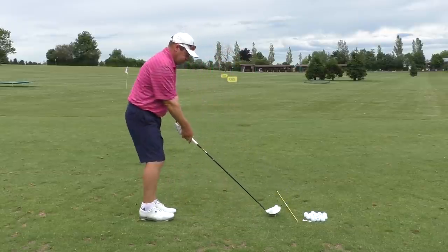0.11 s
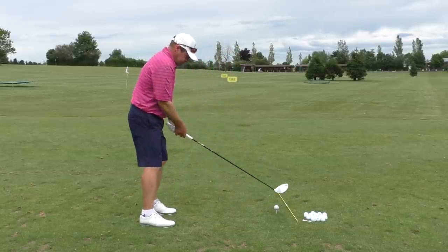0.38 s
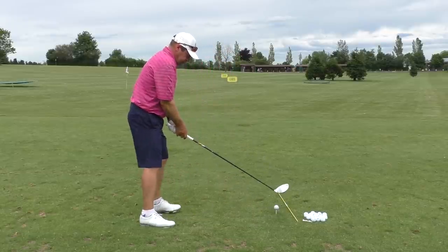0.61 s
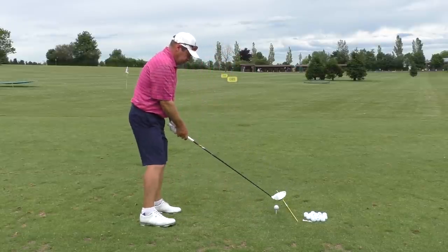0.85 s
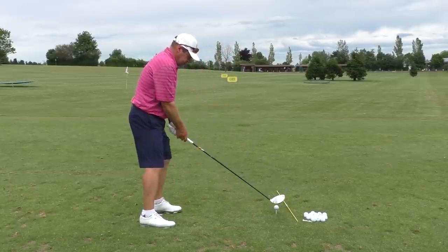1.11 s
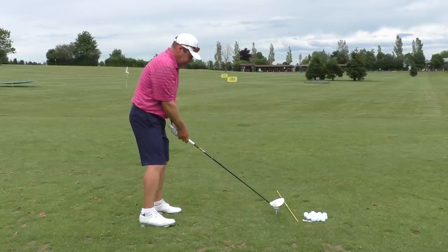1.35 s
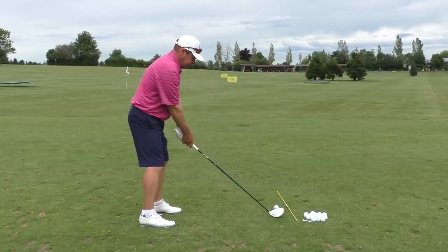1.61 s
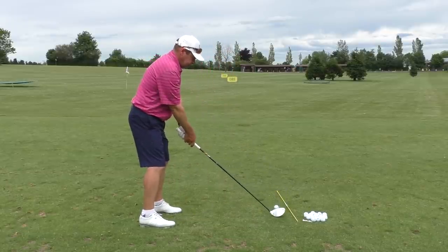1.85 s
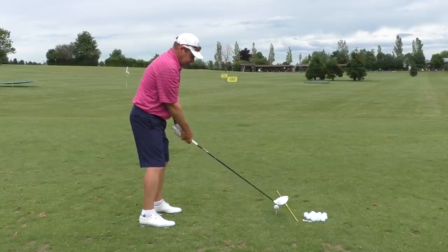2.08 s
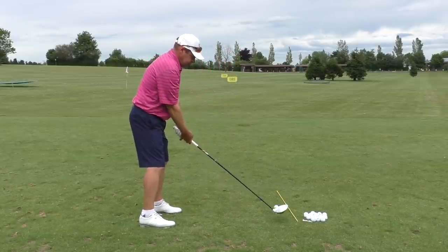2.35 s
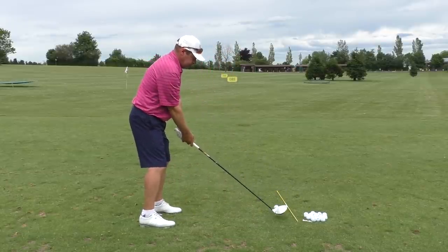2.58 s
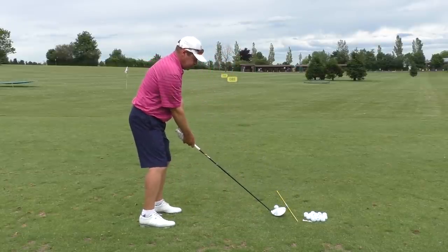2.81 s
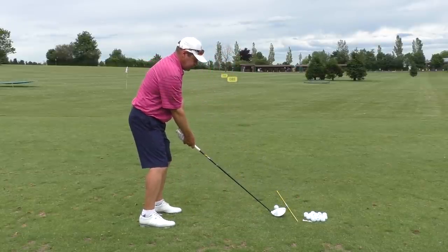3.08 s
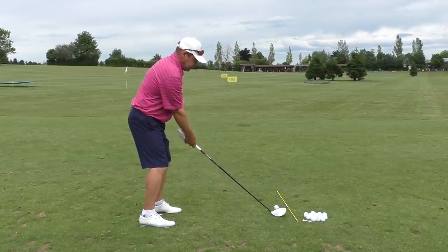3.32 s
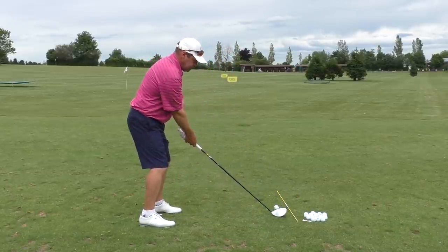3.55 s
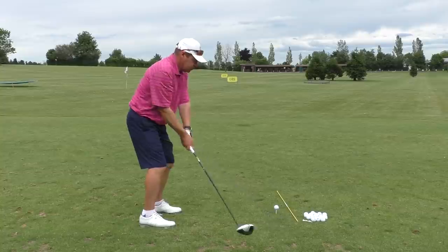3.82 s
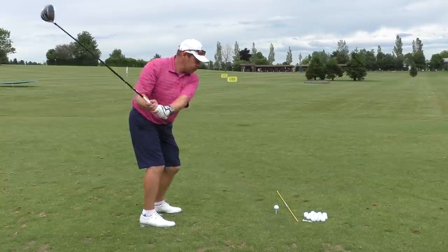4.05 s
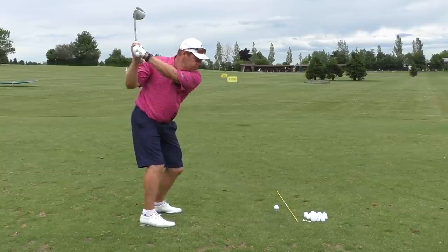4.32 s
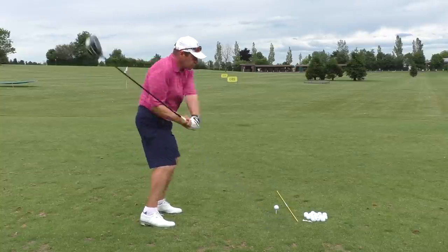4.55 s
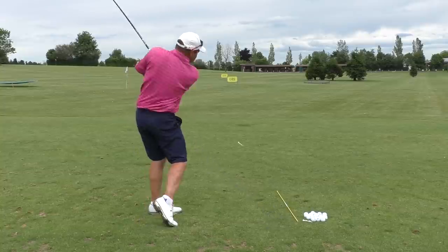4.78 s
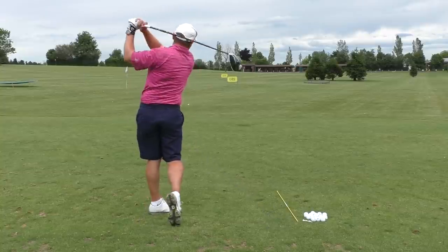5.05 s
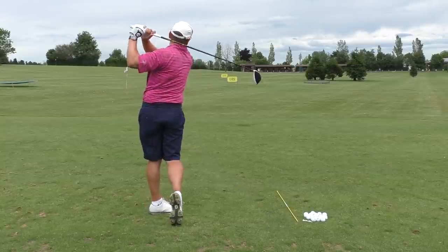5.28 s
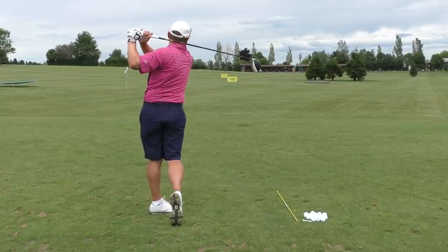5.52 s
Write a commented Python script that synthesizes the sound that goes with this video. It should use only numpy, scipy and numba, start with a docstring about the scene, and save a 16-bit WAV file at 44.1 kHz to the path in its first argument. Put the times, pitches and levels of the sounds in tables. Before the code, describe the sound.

A quiet open driving range, heard in mono by one microphone near the golfer. A soft murmur of air and distant traffic, a faint low engine hum and gusting wind rumble, strongest around 2.5 and 3.1 s, run throughout. Sparrows give brief warbled chirps at about 0.45, 1.0, 2.1, 2.8, 3.7, 4.3 and 5.2 s, among fainter gliding notes, trills and far twitter. Small ticks fall at 0.2 and 1.8 s; the club head brushes grass with a faint grainy hiss at 1.7 and 3.7 s. At 4.65 s a very short rising whoosh leads to the strike at 4.73 s: an extremely loud, sharp, slightly distorted metallic crack with a thud and bright hollow ring, mostly gone within a tenth of a second. The background dips briefly. Thin hiss, faint singing metal and a wavering high whistle fade by 5.27 s, with a small tick near 5.2 s; birds and murmur continue to the end at about 5.6 s.

```python
"""Golf drive on an open range. From the start: sparrow chirps (warbled sines) and further birds (gliding notes),
over engine orders, murmur in noise bands and wind rumble. Ticks fall here and there; at 1.7 and 3.7 s the club
head brushes the grass (grainy hiss). At 4.65 s the shaft whooshes (noise bands that rise), at 4.73 s the ball
cracks off the face and the hollow head rings (decaying modes, noise bursts); the input clips and the gain ducks.
Then a thin hiss, a singing head and a faint whistle up to 5.27 s, while birds and background go on."""
import sys
import numpy as np
from scipy import signal
from scipy.fft import rfft, irfft
from scipy.io import wavfile
from scipy.ndimage import uniform_filter1d, minimum_filter1d
from numba import njit

SR = 44100
rng = np.random.default_rng(int(sys.argv[2]) if len(sys.argv) > 2 else 0)


def transcribe(u):
    """Save the signal u as a 16-bit wav file named by the first command-line argument.

    u: samples, shape (n,) or (channels, n), limited to [-1, 1]; the rate is SR.
    q: integer samples, one column per channel.
    """
    v = np.clip(np.atleast_2d(u).T, -1, 1)
    q = np.round(v * 32767).astype(np.int16)
    wavfile.write(sys.argv[1], SR, q)


def volts_from_decibels(level):
    """Turn decibel levels (scalar or array-like) into linear amplitude factors."""
    exponent = np.asarray(level, float) / 20
    return 10 ** exponent


N = 249253
T = np.arange(N) / SR  # time [s]

STRIKE_S, FULL_SPEED_S = 4.7314, 4.711
# modes of the hollow head: (frequency [Hz], level [dB], t60 [s])
HEAD_MODES = [(3117, -22, .08), (3222, -22, .07), (3325, -26, .14), (3670, -11, .045), (3898, 0, .08),
              (4091, -11, .055), (4226, -24, .085), (4810, -22, .05), (5120, -24, .085), (5416, -13, .09),
              (5770, -17, .08), (5895, -14, .09), (6130, -19, .08), (6363, -28, .066), (6804, -24, .056),
              (7526, -18, .04), (7660, -32, .084), (8899, -32, .06), (9975, -29, .055), (10980, -30, .05),
              (11500, -26, .03)]
# thud of the squashed ball and face: (frequency [Hz], level [dB], t60 [s])
BALL_MODES = [(720, 12, .0048), (340, -3, .007), (130, -15, .02), (1650, -3, .011), (2200, -8, .01),
              (2700, -6, .012)]
# slowest modes, raised a little by the head's motion: (frequency [Hz], level [dB])
SLOWEST_MODES = [(3945, 0), (3330, -5), (5835, -7), (5420, -12), (4230, -11)]
# the head sings on as it turns, sags slowly, then turns away
SING_FROM_S, SING_DB, SING_SAG_DB_S, SING_AWAY_S, SING_AWAY_DB_S = 4.802, -46, 46.5, 4.92, 231.5

# downswing: onset slope, then gain and shedding pitch at full speed with the climb towards each
RUSH_FROM_S, RUSH_ONSET_DB_S = 4.65, 650
RUSH_DB, RUSH_DB_S, SHED_HZ, SHED_HZ_S = -30.5, 110, 711, 1750
MID_DB, MID_DB_S, TOP_DB, TOP_DB_S = -45.5, 260, -56.5, 250  # two hisses likewise
# follow-through, air and grass blades: (peak time [s], gain [dB], rise [dB/s], fall [dB/s])
FOLLOW_SWELLS = [(4.815, -69, 300, 80), (4.876, -64.5, 120, 180), (4.96, -78, 60, 27)]

# pitch of the thin whistle after the blow: (time [s], frequency [Hz])
WHISTLE_PITCH = [(4.75, 2021), (4.88, 2135), (5.1, 2190), (5.165, 2242), (5.27, 2250)]
# its flares: (peak time [s], level of partial 1 [dB], of partial 2 [dB], of partial 3 [dB])
WHISTLE_FLARES = [(4.888, -50.5, -54, -56), (5.02, -75, -61.5, -72.5), (5.168, -80, -56.5, -61)]
# slopes of its flares, one row a partial: (rise [dB/s], fall [dB/s])
FLARE_SLOPES = [(55, 390), (300, 277), (380, 214)]

# the sole sweeps the grass: (peak time [s], gain [dB], rise [dB/s], fall [dB/s])
BRUSH_SWELLS = [(1.72, -76, 400, 119.5), (3.68, -73, 450, 60), (3.765, -68, 110, 150)]
# small ticks: (time [s], gain [dB], frequency [Hz], t60 of the noise part [s])
TICKS = [(.1755, -44, 2500, .012), (.1755, -46, 1300, .012), (.1755, -44, 650, .015),
         (1.769, -42, 1420, .016), (1.769, -49, 2800, .01), (5.234, -48, 800, .015),
         (1.435, -60, 11000, .008), (5.0, -58, 13000, .008), (5.425, -55, 9000, .008),
         (1.52, -54, 3500, .01), (3.58, -54, 4000, .008), (.11, -56, 3600, .008)]

# sparrow chirps: (time of the arch top [s], gain [dB], length after it [s])
CHIRPS = [(.451, -51, 0.0206), (1.037, -47, 0.086), (2.112, -52, 0.0208), (2.83, -48.5, 0.075),
          (3.699, -49.5, 0.024), (4.323, -49, 0.108), (5.171, -56.5, 0.073)]
# second voice in a long chirp: (time from the arch top [s], length [s], start [Hz], end [Hz], relative gain [dB])
STROKES = [(-.031, 0.0096, 5580, 6520, -22.5), (-.021, .0055, 6510, 4416, -16),
           (-.014, .0068, 3553, 5510, -7), (.0, .0061, 4704, 5520, -14.5)]
# low stroke, thrice at the end of a long chirp: (length [s], start [Hz], end [Hz], relative gain [dB])
CLOSING_STROKE = (0.003, 2621.5, 1900.5, -11)
CLOSING_S, CLOSING_GAP_S = .088, 0.0094
# a high arch, then a warble on a sinking pitch that fades and breaks once
ARCH_HZ, ARCH_S, ARCH_DB, SINK_HZ, SINK_S, REST_HZ = 879.8, .007, -5, 613, 0.037, 3132.5
WARBLE_HZ, WARBLE_S, WARBLE_TOP_S = 230, .0132, .028  # depth, period, one crest
FADE_DB_S, BREAK_S, BREAK_WIDE_S, BREAK_DB = 150.5, .037, 0.0052, -16
# a short chirp is said again, its arch swallowed
REPEAT_S, REPEAT_DB, REPEAT_ARCH_DB, REPEAT_LONG_S = .021, 2, -16, .014

# repeats of one falling stroke: (time [s], gain [dB])
FALLS = [(.314, -60), (.392, -60.5), (.478, -59.5), (.552, -62), (.632, -63)]
# that stroke: (length [s], start [Hz], end [Hz])
FALL_STROKE = (.036, 3380, 2270)
FALL_ECHO_S, FALL_ECHO_DB = .012, -7  # off the trees
# forked calls: (time [s], gain of the rising voice [dB], of the falling voice [dB])
FORKS = [(.058, -66, -63), (.13, -69, -76.5), (.206, -70.5, -60.5)]
# rising voice: (length [s], start [Hz], end [Hz])
FORK_UP = (.016, 4830, 5800)
# falling voice: (length [s], start [Hz], end [Hz])
FORK_DOWN = (0.03, 4800, 3120)
# single notes of further birds: (time [s], length [s], start [Hz], end [Hz], gain [dB])
NOTES = [(.139, .06, 4500, 4700, -70), (.362, .03, 4060, 3450, -66.5), (.724, .006, 4440, 2890, -59),
         (.745, .008, 3504, 4600, -62), (.857, 0.0616, 4450, 4350, -65), (1.674, 0.0925, 2450, 2260, -66.5),
         (1.683, 0.0225, 3686, 3400, -63), (1.79, 0.042, 2043, 2060, -63.5),
         (1.802, 0.0465, 4000, 3200, -62.5), (2.037, 0.0075, 4280, 2800, -55.5),
         (2.332, 0.0081, 2770, 2300, -64), (2.469, 0.0117, 2886, 2300, -64),
         (2.719, 0.0486, 3250, 3540, -67.5), (2.785, 0.0105, 3420, 2800, -60.5),
         (3.062, 0.068, 5396, 4300, -74.5), (3.2, 0.112, 3700, 2700, -66),
         (3.343, 0.243, 3299, 3460, -69.5), (3.6, .076, 3934, 3500, -68), (3.862, 0.1035, 2940, 3165, -64),
         (4.02, 0.037, 3350, 3050, -61.5), (4.075, 0.0234, 3320, 2970, -65),
         (4.118, .03, 3910, 3400, -66.5), (4.148, .035, 3360, 3340, -61.5), (4.24, 0.0384, 3000, 3050, -66),
         (4.283, 0.06, 3250, 3470, -66)]
# high trills: (time [s], length [s], start [Hz], end [Hz], gain [dB])
TRILLS = [(1.874, 0.098, 4460, 4190, -62), (2.0, 0.112, 4445, 4605, -65.5),
          (2.18, 0.062, 4640, 5090, -68.5)]
TRILL_PER_S = 62.7

# spectrum of the open-air murmur: (frequency [Hz], relative density [dB per Hz])
AIR_SPECTRUM = [(12, -39.5), (20, -13), (120, 2), (168, -4.5), (255, -11), (319, -12.5), (347, -16.5),
                (388, -14), (446, -17), (1190, -17), (1760, -22.5), (2500, -26.5), (3740, -26.5),
                (5230, -38), (14300, -41.5), (16000, -44.5)]
AIR_DB = -51
# distant engine: (time [s], level of order 1 [dB], of order 2 [dB], of order 3 [dB])
ENGINE_ORDERS = [(0, -75, -75, -74.5), (.66, -58.5, -70, -72.5), (1.3, -67, -71, -72),
                 (2.2, -62, -69.5, -74), (2.7, -57, -77, -68.5), (3.3, -59, -71.5, -61.5),
                 (3.9, -61, -60, -66), (4.3, -62, -70.5, -70.5), (5.1, -69.5, -68, -78),
                 (5.65, -68, -62, -71.5)]
ENGINE_HZ = 127.58
# wind on the microphone: (time [s], level [dB])
WIND_LEVEL = [(0, -74.5), (.9, -63.5), (2.3, -62.5), (2.55, -55.5), (2.8, -62), (3.1, -52), (3.4, -61.5),
              (4.5, -61), (5.2, -70.5), (5.65, -63)]


def curve(rows):
    """Soft gate open between a table's ends, then its columns at every sample."""
    s, *columns = np.transpose(rows)
    gate = np.clip(np.minimum(T - s[0], s[-1] - T) / .006, 0, 1)
    return [gate] + [np.interp(T, s, c) for c in columns]


def swell(peak_s, db, rise_db_s, fall_db_s):
    """Gain that climbs to db at peak_s and falls away, both straight in dB."""
    return volts_from_decibels(db - np.maximum(rise_db_s * (peak_s - T), fall_db_s * (T - peak_s)))


def unit(x):
    """Scale to rms 1."""
    return x / np.sqrt(np.mean(x ** 2))


@njit
def svf(x, hz, width):
    """State-variable band-pass with a moving centre, gain 1 there; width in Hz."""
    y, band, low = np.empty(len(x)), 0., 0.
    for i in range(len(x)):
        g, k = np.tan(np.pi * hz[i] / SR), width / hz[i]
        v = (band + g * (x[i] - low)) / (1 + g * (g + k))
        band, low, y[i] = 2 * v - band, low + 2 * g * v, k * v
    return y


def hiss(hz, width, count=N):
    """White noise through two equal band-passes, rms 1."""
    hz = hz + np.zeros(count)
    once = svf(rng.standard_normal(count), hz, width)
    return unit(svf(once, hz, width))


def walk(rate):
    """Random levels held 1 / rate s and slewed twice; spread near 1."""
    k = int(SR / rate)
    steps = np.repeat(rng.standard_normal(N // k + 1), k)
    return 1.3 * uniform_filter1d(uniform_filter1d(steps, k), k)[:N]


def tone(hz):
    """Sine of rms 1 on a moving pitch."""
    return np.sqrt(2) * np.sin(2 * np.pi * np.cumsum(hz) / SR)


def ring(modes, rise_s, phase=0):
    """Half a second of exponentially decaying modes that build up over rise_s."""
    t = T[:SR // 2]
    waves = sum(volts_from_decibels(db) * np.sin(2 * np.pi * hz * t + phase) * 1000 ** (-t / t60_s) for hz, db, t60_s in modes)
    return waves * (1 - np.exp(-(t / rise_s) ** 2))


def add(out, s, x):
    """Mix x in from time s."""
    i = int(s * SR)
    out[i:i + len(x)] += x[:N - i]


def strike():
    """The ball thuds at once, the shell takes a moment to ring up, a bright crack dies in milliseconds."""
    out, t = np.zeros(N), T[:SR // 2]
    crack = volts_from_decibels(-5.5) * hiss(6000., 8700., count=len(t)) * 1000 ** (-t / .0148)
    crack = crack + volts_from_decibels(-5) * hiss(13200., 6200., count=len(t)) * 1000 ** (-t / .008)
    # many dense upper modes blur into a metallic rattle
    rattle = volts_from_decibels(-22) * hiss(4400., 5000., count=len(t)) * 1000 ** (-t / .1)
    # the face swings out of line within a few hundredths of a second, unevenly
    turn_db = -9 * (1 - np.exp(-(t / .02) ** 3))
    uneven_db = 2.5 * walk(200)[:len(t)] * np.clip(t / .02, 0, 1)
    shell = ring(HEAD_MODES, .0014) * volts_from_decibels(turn_db + uneven_db)
    thud = ring(BALL_MODES, .00005, phase=1.15)
    add(out, STRIKE_S, volts_from_decibels(1.4) * thud + volts_from_decibels(-.5) * shell + crack + rattle)
    return out


def singing_head():
    """The slowest modes, as narrow noise bands, waver as the head turns its face away and back."""
    sing = swell(SING_FROM_S, SING_DB, 600, SING_SAG_DB_S) * swell(SING_AWAY_S, 0, 0, SING_AWAY_DB_S)
    return sing * sum(volts_from_decibels(mode_db + 3 * walk(35)) * hiss(hz, 190.) for hz, mode_db in SLOWEST_MODES)


def swing():
    """Vortices shed by the shaft hum unevenly over a broad rush; afterwards only a thin hiss."""
    lead_s = np.clip(FULL_SPEED_S - T, 0, .2)
    gate = volts_from_decibels(-RUSH_ONSET_DB_S * np.maximum(RUSH_FROM_S - T, 0)) * (T < STRIKE_S)
    rush = volts_from_decibels(1.5) * hiss(SHED_HZ - SHED_HZ_S * lead_s, 400.)
    rush = rush + volts_from_decibels(-1.5) * hiss(300., 380.) + volts_from_decibels(-9) * hiss(1300., 1500.)
    grainy_db = 2.5 * walk(120)
    down = gate * volts_from_decibels(RUSH_DB - RUSH_DB_S * lead_s + grainy_db) * rush
    air = volts_from_decibels(MID_DB - MID_DB_S * lead_s) * hiss(3600., 3000.)
    air = air + volts_from_decibels(TOP_DB - TOP_DB_S * lead_s) * hiss(8000., 12000.)
    after = hiss(10000., 10000.) + volts_from_decibels(11) * hiss(5000., 4270.) + volts_from_decibels(13.5) * hiss(1010., 2300.)
    follow = sum(swell(*row) for row in FOLLOW_SWELLS) * (T > STRIKE_S)
    return down + gate ** .3 * air + follow * volts_from_decibels(2 * walk(80)) * after


def whistle():
    """A wavering sine fundamental under two breathy partials of narrow noise."""
    gate, hz = curve(WHISTLE_PITCH)
    gains = [sum(swell(s, dbs[k], *FLARE_SLOPES[k]) for s, *dbs in WHISTLE_FLARES) for k in range(3)]
    breathy = sum(gains[k] * hiss(hz * (k + 1), 90. * (k + 1)) for k in range(1, 3))
    return gate * (gains[0] * volts_from_decibels(2.5 * walk(40)) * tone(hz) + breathy)


def grass():
    """Blades scratch the sole: grainy hiss that faintly excites the head's modes."""
    level = sum(swell(*row) for row in BRUSH_SWELLS)
    grain = rng.standard_normal(N) * volts_from_decibels(2.46 * rng.exponential(size=N))
    scratch = unit(svf(grain, np.full(N, 8500.), 11000.))
    bands = volts_from_decibels(-1.5) * hiss(5840., 120.) + volts_from_decibels(-3) * hiss(6240., 3000.)
    excited = unit(signal.oaconvolve(grain, ring(HEAD_MODES, .001))[:N])
    return level * (scratch + bands + volts_from_decibels(-12.5) * excited)


def ticks():
    """Each tick is one damped mode plus a decaying noise band around it."""
    out = np.zeros(N)
    for s, db, hz, t60_s in TICKS:
        rattle = hiss(hz, .73 * hz, count=SR // 2) * 1000 ** (-T[:SR // 2] / t60_s)
        add(out, s, volts_from_decibels(db) * (ring([(hz, 3, t60_s / 2)], .0001) + rattle))
    return out


def chirp(length_s, arch_db):
    """One sparrow phrase, a sine on a warbling pitch, starting 10 ms before the top of its arch."""
    t = T[:int((length_s + .03) * SR)] - .01
    after_s = np.maximum(t, 0)
    warble_hz = WARBLE_HZ * np.cos(2 * np.pi * (t - WARBLE_TOP_S) / WARBLE_S) * np.clip(t / .014, 0, 1)
    arch = np.exp(-np.abs(t / ARCH_S) ** 2.8)
    hz = REST_HZ + SINK_HZ * np.exp(-after_s / SINK_S) + ARCH_HZ * arch + warble_hz
    break_db = BREAK_DB * np.exp(-((t - BREAK_S) / BREAK_WIDE_S) ** 2)
    db = arch_db * arch - FADE_DB_S * after_s + break_db
    edges = np.clip((t + .008) / .003, 0, 1) ** 2 * volts_from_decibels(-3000 * np.maximum(t - length_s, 0))
    flutter_db = 3.5 * walk(200)[:len(t)]
    return edges * volts_from_decibels(db + flutter_db) * tone(hz * (1 + .02 * walk(300)[:len(t)]))


def sparrow(out):
    """Short chirps are said twice; long ones carry a second voice and three closing strokes."""
    closing = [(CLOSING_S + k * CLOSING_GAP_S, *CLOSING_STROKE) for k in range(3)]
    for top_s, near_db, length_s in CHIRPS:
        add(out, top_s - .01, volts_from_decibels(near_db) * chirp(length_s, ARCH_DB))
        if length_s < .05:
            again = chirp(REPEAT_LONG_S, REPEAT_ARCH_DB)
            add(out, top_s - .01 + REPEAT_S, volts_from_decibels(near_db + REPEAT_DB) * again)
        if length_s > .05:
            for lag_s, span_s, from_hz, to_hz, side_db in list(STROKES) + closing:
                add(out, top_s + lag_s, volts_from_decibels(near_db + side_db) * sweep(span_s, from_hz, to_hz))


def sweep(length_s, from_hz, to_hz, trill_per_s=0):
    """One gliding, slightly hoarse bird note, chopped at the trill rate."""
    t = T[:int(length_s * SR)]
    beat = .5 + .5 * np.cos(2 * np.pi * trill_per_s * t)
    wobble, flutter = uniform_filter1d(rng.standard_normal((2, len(t))), size=150, axis=1) * np.sqrt(150)
    hz = (from_hz + (to_hz - from_hz) * (t / length_s) ** .8) * (1 + .01 * wobble)
    return np.sqrt(np.sin(np.pi * t / length_s)) * beat * volts_from_decibels(2.3 * flutter) * tone(hz)


def further_birds(out):
    """Gliding notes: falling strokes with an echo, forked calls, single notes, trills, random twitter."""
    for s, db in FALLS:
        add(out, s, volts_from_decibels(db) * sweep(*FALL_STROKE))
        add(out, s + FALL_ECHO_S, volts_from_decibels(db + FALL_ECHO_DB) * sweep(*FALL_STROKE))
    for s, up_db, down_db in FORKS:
        add(out, s, volts_from_decibels(up_db) * sweep(*FORK_UP))
        add(out, s, volts_from_decibels(down_db) * sweep(*FORK_DOWN))
    for rows, trill_per_s in (NOTES, 0), (TRILLS, TRILL_PER_S):
        for s, length_s, from_hz, to_hz, db in rows:
            add(out, s, volts_from_decibels(db) * sweep(length_s, from_hz, to_hz, trill_per_s))
    # far twitter, 14 per s, mostly short falling strokes
    for when, span, high, fall, size in rng.random((int(14 * N / SR), 5)):
        from_hz = 3000 + 1500 * high
        note = sweep(.0088 + .03 * span ** 2, from_hz, from_hz * (1.03 - .41 * fall))
        add(out, when * N / SR, volts_from_decibels(-72 + 5.5 * size) * note)


def birds():
    """Near-sine whistles with a rasp; trees and ground smear each with a short diffuse tail."""
    out, t = np.zeros(N), T[:SR // 2]
    sparrow(out)
    further_birds(out)
    tail = rng.standard_normal(len(t)) * 1000 ** (-t / .35) * (t > .012)
    return out + volts_from_decibels(-5.5) * signal.oaconvolve(out, tail / np.sqrt(np.sum(tail ** 2)))[:N]


def engine():
    """Three engine orders, sines on one slightly drifting pitch, each wavering in level."""
    _, *dbs = curve(ENGINE_ORDERS)
    hz = ENGINE_HZ * (1 + .004 * walk(1.2))
    return sum(volts_from_decibels(db + 2.3 * walk(6)) * tone(hz * (k + 1)) for k, db in enumerate(dbs))


def murmur():
    """Traffic and open air: half-octave noise bands that swell together and flicker alone."""
    out, common, (hz, db) = 0, walk(.955), np.transpose(AIR_SPECTRUM)
    f = np.fft.rfftfreq(N, 1 / SR) + 1  # + 1 avoids log 0
    colour = volts_from_decibels(np.interp(np.log(f), np.log(hz), db))
    for centre_hz in 25 * 2 ** np.arange(0, 9.6, .5):
        band = np.clip(1 - np.abs(np.log2(f / centre_hz)) / .5, 0, 1) ** .5
        # far twittering makes the bird band the liveliest
        lively_db = .5 + 1.3 * np.exp(-np.log2(centre_hz / 3300) ** 2 / .2)
        noise = irfft(rfft(rng.standard_normal(N)) * colour * band, N)
        out = out + volts_from_decibels(.5 * common + lively_db * walk(6.1)) * noise
    return volts_from_decibels(AIR_DB) * unit(out)


def wind():
    """Wind on the microphone: gusting low rumble around 38 Hz."""
    rumble = unit(svf(hiss(38., 36.), np.full(N, 38.), 40.))
    return volts_from_decibels(curve(WIND_LEVEL)[1] + 2.3 * walk(12)) * rumble


def scene():
    """All sources summed at one microphone."""
    club = strike() + singing_head() + swing() + whistle() + grass() + ticks()
    return (club + birds() + engine() + murmur() + wind())[None]


def top_cut(x):
    """Nothing passes above the cut-off."""
    return signal.sosfilt(signal.butter(12, 16510, fs=SR, output="sos"), x)


def record(dry):
    """A limiter holds the gain down for a moment after an overload; the input clips."""
    over = np.abs(dry) > .5
    hold = int(.055 * SR)
    held = -minimum_filter1d(-1. * over, hold, origin=hold // 2 - 1)  # each overload lasts 55 ms
    smooth = signal.lfilter([.006], [1, -.994], held)
    duck_db = -5 * smooth
    mix = np.clip(dry * volts_from_decibels(duck_db), -.96, .96)
    return top_cut(mix)


dry = scene()
out = record(dry)
transcribe(out)
```